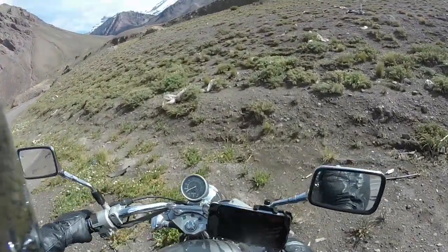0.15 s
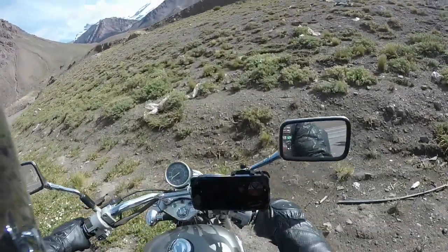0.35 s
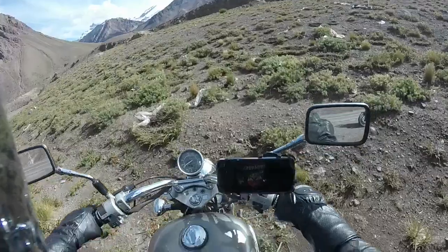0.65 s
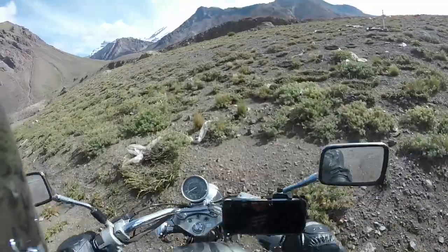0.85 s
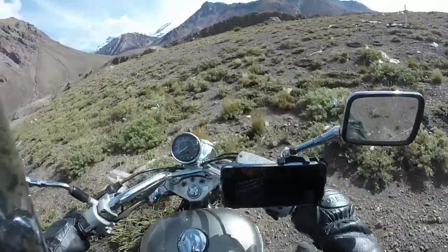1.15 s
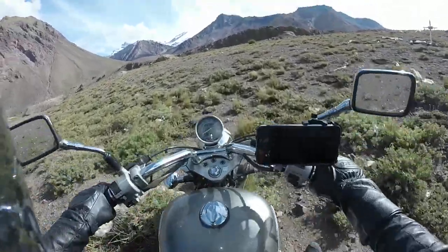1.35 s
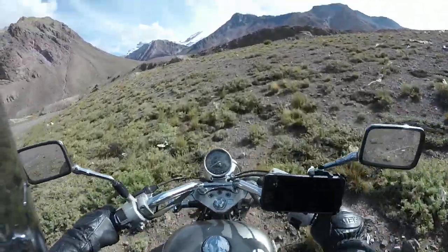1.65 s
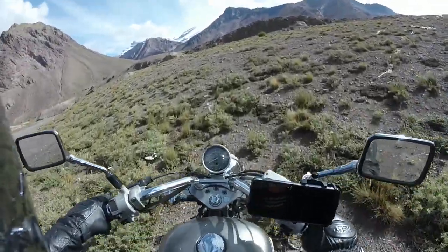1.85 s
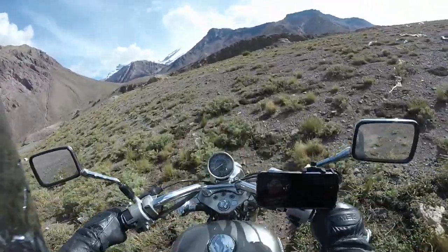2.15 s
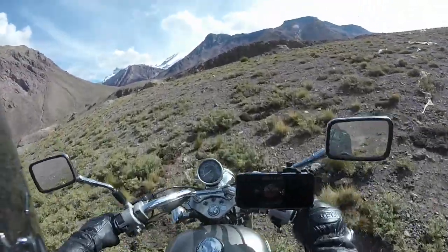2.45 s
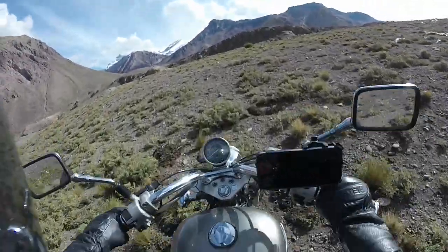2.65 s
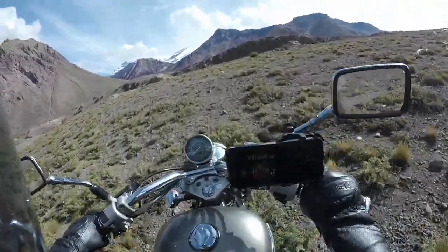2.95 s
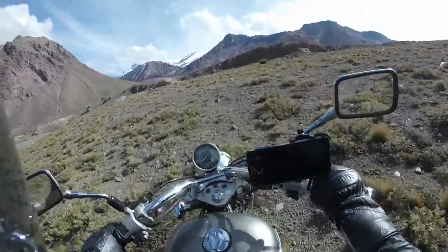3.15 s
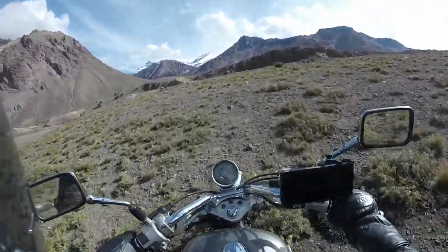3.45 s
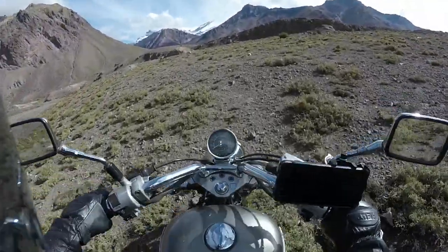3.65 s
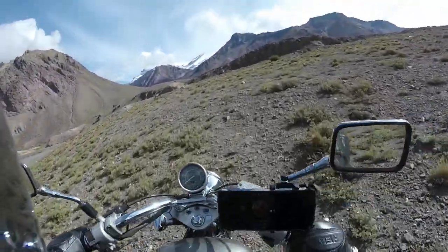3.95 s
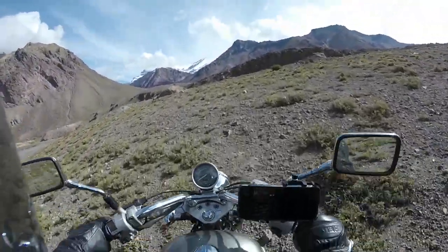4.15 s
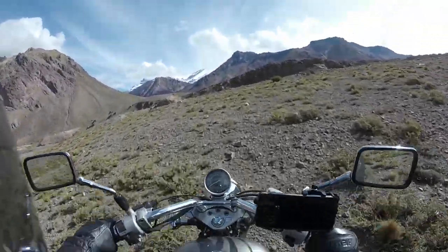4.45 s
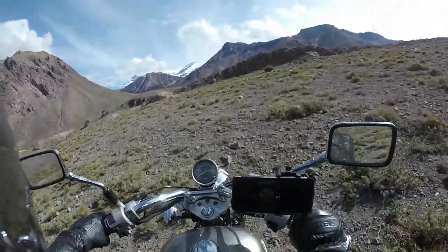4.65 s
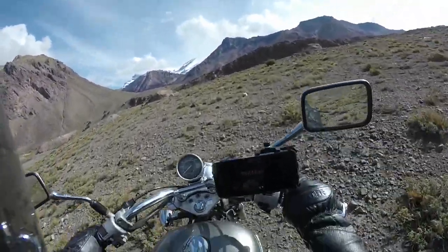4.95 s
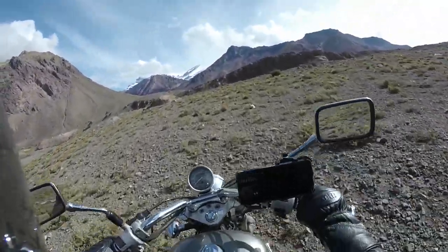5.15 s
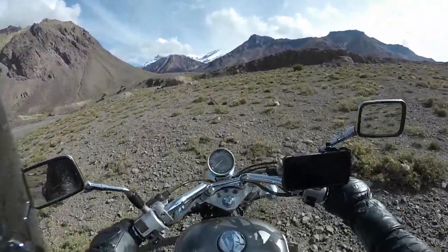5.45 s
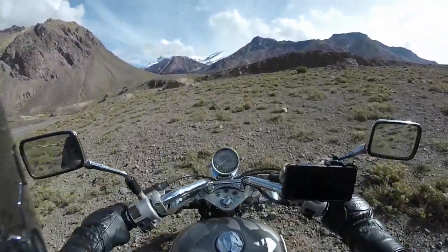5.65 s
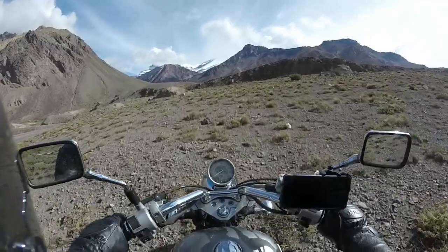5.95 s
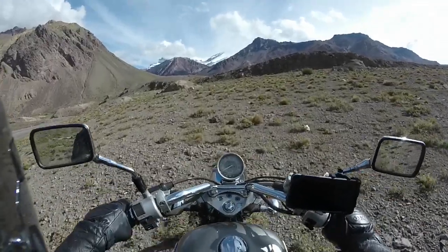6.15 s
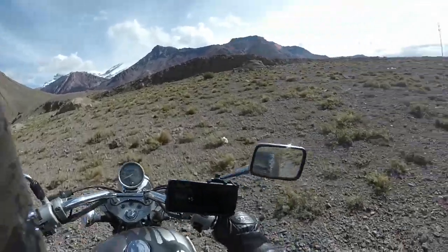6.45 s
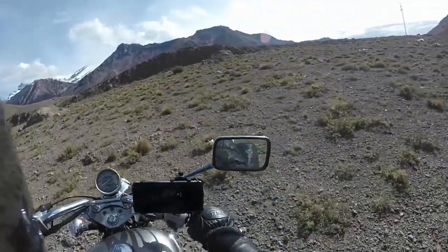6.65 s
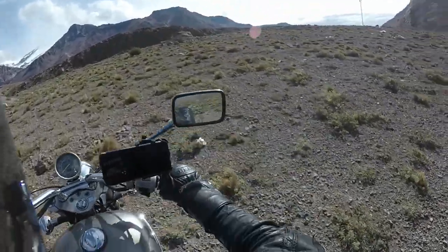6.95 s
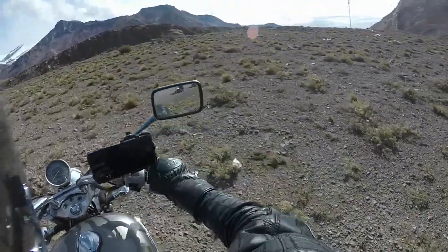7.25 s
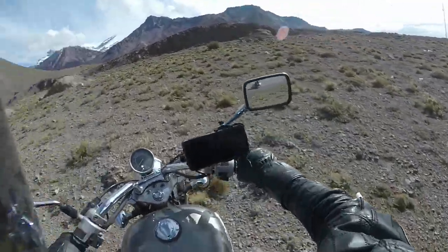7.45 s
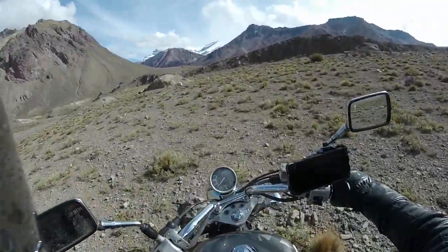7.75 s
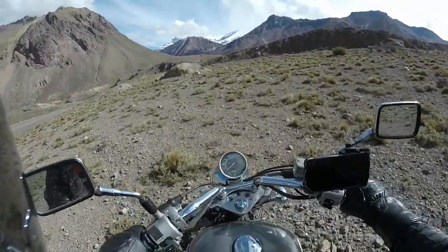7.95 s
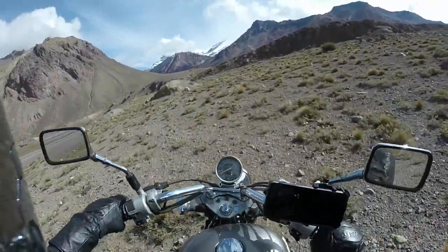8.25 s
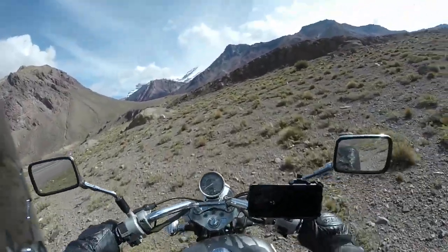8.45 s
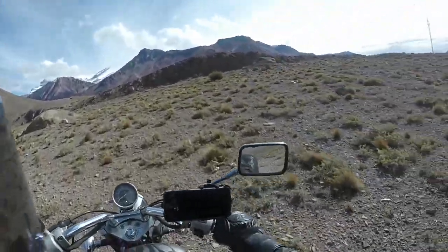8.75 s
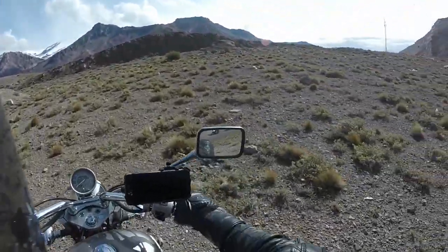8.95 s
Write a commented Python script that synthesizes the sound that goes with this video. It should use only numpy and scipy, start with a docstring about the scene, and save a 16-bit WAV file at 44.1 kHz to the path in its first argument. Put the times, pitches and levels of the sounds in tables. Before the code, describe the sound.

Slow, lumpy twin-cylinder exhaust at first, with a faint hiss that soon stops and a cluster of frame thuds and hard rattling knocks. The motor then pulls harder, its bark thickening into a drone with small metallic pings. Afterwards the revs sag, dip briefly and recover unevenly, with brief helmet-on-jacket strokes. Stones rumble softly underneath; outdoors, no echo, microphone on the rider.

```python
"""A V-twin cruiser crawls up a gravel track in open hills, heard from a camera on the rider's helmet.
At first the engine turns slowly, its two cylinders firing unevenly into resonant pipes over ringing fins and
ticking valves; a faint hiss stops at 1.6 s. Bumps ring the frame and the camera mount, mostly in the first 4 s,
with bursts of deep noise near 33 Hz as the mount bounces. The engine climbs to its fastest near 5.5 s; then its
speed wavers, and stick-slip noise of helmet on jacket comes in strokes. Stones rumble softly throughout."""
import sys
import numpy as np
from scipy import signal
from scipy.fft import rfft, irfft, next_fast_len
from scipy.io import wavfile
from scipy.ndimage import uniform_filter1d

SR = 44100
rng = np.random.default_rng(int(sys.argv[2]) if len(sys.argv) > 2 else 0)


def to_wav(s):
    """Save 16-bit WAV."""
    ch = np.atleast_2d(s).T  # columns
    pcm = np.round(np.clip(ch, -1, 1) * 32767)  # PCM
    wavfile.write(sys.argv[1], SR, pcm.astype(np.int16))


N = 400869


def from_db(db):
    """Level law: decibels to amplitude gain."""
    return 10 ** (np.asarray(db) / 20)


def in_time(rows):
    """Linear interpolation: the columns of a curve at every sample."""
    s, *columns = np.transpose(rows)
    return [np.interp(np.arange(N) / SR, s, c) for c in columns]


def even(x, size=11000):
    """Level normalisation: hold the running rms at 1."""
    power = uniform_filter1d(uniform_filter1d(x * x, size), size)
    return x / np.sqrt(np.maximum(power, 1e-20))


def cut(x, hz, kind, order=2):
    """Butterworth filtering: low- or high-pass with a flat passband."""
    return signal.sosfilt(signal.butter(order, hz, kind, fs=SR, output="sos"), x)


def colour(x, spectrum):
    """Spectral shaping by (f/Hz, level/dB) points, falling away beyond both ends."""
    hz, db = np.transpose(spectrum)
    size = next_fast_len(N + SR // 4)
    bins = np.maximum(np.arange(size // 2 + 1) * SR / size, 1)
    low_end = np.minimum(bins / hz[0], 1) ** 2
    high_end = np.minimum(hz[-1] / bins, 1) ** 6
    gain = from_db(np.interp(np.log(bins), np.log(hz), db)) * low_end * high_end
    return irfft(rfft(x, size) * gain, size)[:N]


def resonate(x, hz, width_hz, db):
    """Damped resonance: one mode with the given gain at its top."""
    r = np.exp(-np.pi * width_hz / SR)
    poles = [1, -2 * r * np.cos(2 * np.pi * hz / SR), r * r]
    return from_db(db) * (1 - r * r) / 2 * signal.lfilter([1, 0, -1], poles, x + 1e-18)


def glide(x, hz, width_hz):
    """Heterodyne resonance: a mode whose pitch may move, with gain 1 at its top."""
    turn = np.exp(2j * np.pi * np.cumsum(hz * np.ones(N)) / SR)
    r = np.exp(-np.pi * width_hz / SR)
    return 2 * np.real(turn * signal.lfilter([1 - r], [1, -r], x / turn + 1e-18))


def body(x, modes):
    """Modal superposition: resonances side by side."""
    return sum(resonate(x, *mode) for mode in modes)


def clicks(at, sizes):
    """Impulse excitation: single clicks at the given samples."""
    return np.bincount(np.clip(at, 0, N - 1).astype(int), sizes, N)


def fade(x, seconds):
    """Exponential decay: each click leaves a tail of its own height."""
    return signal.lfilter([1], [1, -np.exp(-1 / (seconds * SR))], x + 1e-18)


def swell(start, length, db, attack_s, release_s, sag_db_per_s):
    """Exponential envelope: the gain rises, sags while it lasts and dies away."""
    t = np.arange(N) / SR - start
    edges = np.minimum(t, 0) / attack_s - np.maximum(t - length, 0) / release_s
    return from_db(db - sag_db_per_s * np.clip(t, 0, length)) * np.exp(np.maximum(edges, -20))


# crankshaft speed: t/s, speed/(turns per minute)
CRANK_SPEED = [(0.0, 1843), (0.3, 1852), (0.9, 1842), (1.25, 2047), (1.5, 2222), (1.7, 2134), (2.0, 2007),
               (2.25, 2087), (2.55, 2095), (2.75, 2497), (3.0, 2372), (3.25, 2399), (3.45, 2219),
               (3.75, 2145), (4.1, 2158), (4.35, 2333), (4.55, 2499), (4.85, 2842), (5.25, 3029),
               (5.55, 3194), (5.85, 3060), (6.1, 3129), (6.35, 3091), (6.65, 2795), (6.95, 2626),
               (7.2, 2491), (7.35, 1976), (7.55, 2488), (7.75, 2385), (8.05, 2514), (8.25, 2131),
               (8.45, 2480), (8.7, 2688), (8.9, 2292), (9.09, 2410)]
# load on the engine: t/s, level/dB
ENGINE_LOAD = [(0.0, -8), (0.35, -4.5), (0.9, -8), (1.2, -5.5), (1.5, 0.5), (2.1, 1), (2.8, 2.5),
               (3.15, 2.5), (3.6, 0.5), (4.35, 1), (4.95, 3.5), (5.5, 1.5), (7.1, 0.5), (7.3, -1),
               (7.55, 1), (7.8, -5.5), (8.2, -0.5), (8.35, 1), (9.09, -4)]
# level of the exhaust's bark beyond what the speed gives: t/s, level/dB
BARK_LEVEL = [(0.0, 3), (0.4, 2), (1.15, -1), (1.65, -4.5), (2.3, 7), (3.5, 5), (3.9, 4.5), (5.0, 7.5),
              (5.35, 7.5), (6.0, 3), (6.7, 4), (7.4, 2), (7.85, -5.5), (8.2, -2), (8.35, 2.5), (8.7, 3.5),
              (9.09, -4)]
# growth of each voice: level/dB at cruising speed, level/dB per doubling of speed, share of the swing
# (the swing is the bark's own level curve for the bark, the load for the rest)
BOOM_GROWTH = (-37.5, 10.8, 0.27)
BARK_GROWTH = (-54.5, 10, 0.88)
CLATTER_GROWTH = (-58, 4.1, 1)
TICK_GROWTH = (-78, 0.68, 2.97)
FRONT_PHASE, REAR_PHASE = -0.135, 0.275   # firing moments (share of a cycle of two turns)
CRUISE_RPM = 2400


def engine():
    """Periodic excitation: exhaust, fins and valve gear are all locked to the crankshaft."""
    rpm, = in_time(CRANK_SPEED)
    load_db, = in_time(ENGINE_LOAD)
    bark_db, = in_time(BARK_LEVEL)
    front = firings(rpm, FRONT_PHASE, jitter_s=.00003)
    rear = firings(rpm, REAR_PHASE, jitter_s=.00003)
    both = np.r_[front, rear] + 0.0008 * SR   # the metal parts answer just after the puff
    boom = even(booming(rpm, both, rough_db=3.0, rear_share=0.83))
    bark = exhaust_bark(front, rear, rpm)
    hum = drones(front, rpm, rough_db=3.0, build_up_hz=71.5)
    clatter = fins(front, rear, rpm, load_db)
    ticks = valve_ticks(both)
    return (boom * loudness(BOOM_GROWTH, rpm, load_db)
            + bark * loudness(BARK_GROWTH, rpm, bark_db)
            + hum + pings()
            + clatter * loudness(CLATTER_GROWTH, rpm, load_db)
            + ticks * loudness(TICK_GROWTH, rpm, load_db))


def loudness(law, rpm, swing_db):
    """Power law: the gain of one engine voice grows with speed and with a share of its swing."""
    cruise_db, db_per_doubling, swing_share = law
    return from_db(cruise_db + db_per_doubling * np.log2(rpm / CRUISE_RPM) + swing_share * swing_db)


def firings(rpm, phase, jitter_s):
    """Four-stroke cycle: the samples at which a cylinder fires, once in two turns."""
    cycles = np.cumsum(rpm) / (2 * 60 * SR) - phase
    at = np.flatnonzero(np.diff(np.floor(cycles)))
    return at + jitter_s * SR * rng.standard_normal(len(at))


# exhaust boom before the mufflers: order (multiple of the cycle rate), relative level/dB
BOOM_ORDERS = [(2, -6), (3, -0.5), (4, -5.5), (5, 8), (6, -15), (7, 7), (8, 4), (9, -5), (10, 0), (11, -2),
               (12, -9.5), (13, -1), (14, -9), (15, -1.5), (16, -9), (17, -4), (18, -15.5), (19, -11),
               (20, -18.5), (21, -21), (22, -13.5), (23, -18.5), (24, -13), (25, -17), (26, -7)]
# transmission of the mufflers: f/Hz, level/dB
MUFFLER_RESPONSE = [(45, -7.5), (100, -7.5), (135, -0.5), (190, 2), (240, -3.5), (295, 5), (350, 0.5),
                    (450, -16.5), (580, -4), (700, -16.5)]
PUSH_LAG, PUSH_SHARE = 0.132, 0.55   # piston's push after the valve's puff: share of a cycle, relative strength


def booming(rpm, at, rough_db, rear_share):
    """Harmonic synthesis: unevenly spaced puffs set the order phases; slow strokes burn less evenly."""
    crest = 0.0694   # each puff peaks this share of a cycle after its valve opens
    cycles = np.cumsum(rpm) / (2 * 60 * SR) - crest
    orders = 0
    for order, db in BOOM_ORDERS:
        front_puff = np.exp(-2j * np.pi * order * FRONT_PHASE)
        rear_puff = rear_share * np.exp(-2j * np.pi * order * REAR_PHASE)
        push = 1 + PUSH_SHARE * np.exp(-2j * np.pi * order * PUSH_LAG)
        phase = np.angle((front_puff + rear_puff) * push)
        orders = orders + from_db(db) * np.cos(2 * np.pi * order * cycles + phase)
    burn = np.interp(np.arange(N), np.sort(at), rng.standard_normal(len(at)))
    strokes = orders * from_db(rough_db * (2000 / rpm) ** 3 * burn)
    ring = resonate(strokes, 210.3, 58, -0.21)   # the pipes' lowest resonance rings on between puffs
    return colour(strokes + ring, MUFFLER_RESPONSE)


# upper resonances of the exhaust pipes: f/Hz, width/Hz, relative level/dB, rear pipe against front level/dB
PIPE_MODES = [(439, 350, -2.5, -3.5), (585, 180, -2.5, -5), (696.5, 710, -6, -0.5), (873, 550, -10, 4)]
PIPE_LAG_S = .0003   # the upper modes sound once the valve is open


def exhaust_bark(front, rear, rpm):
    """Superposition of two sources: each cylinder's puffs ring a pipe of its own."""
    front_modes = [(hz, width_hz, db) for hz, width_hz, db, _ in PIPE_MODES]
    rear_modes = [(hz, width_hz, db + rear_db) for hz, width_hz, db, rear_db in PIPE_MODES]
    exhaust = sum(pipe(at + PIPE_LAG_S * SR, rpm, modes, rough_db=1.3, gas=.009)
                  for at, modes in ((front, front_modes), (rear, rear_modes)))
    return even(colour(exhaust, [(290, -20.0), (400, 2.0), (880, -8), (1000, -4.5)]))


def pipe(at, rpm, modes, rough_db, gas, build_up_hz=70):
    """Pipe resonance: puffs, less even at low speed, and turbulent gas excite standing waves."""
    unevenness_db = rough_db * (2000 / rpm[np.clip(at, 0, N - 1).astype(int)]) ** 2
    burn_db = unevenness_db * rng.standard_normal(len(at))
    flow = fade(fade(clicks(at, from_db(burn_db)), 0.0034), 0.0027) / (0.00013 * SR)
    turbulence = gas * flow * rng.standard_normal(N) * (2300 / rpm) ** 3
    out = 0
    for k, (hz, width_hz, db) in enumerate(modes):
        puffs = clicks(at, from_db(burn_db + unevenness_db * rng.standard_normal(len(at))))
        # turbulence feeds the upper modes most
        drive = puffs + turbulence * np.sqrt(hz / 500)
        swelling = resonate(drive, hz, build_up_hz, 0)   # a standing wave needs a few round trips
        # at the open end successive modes swing in opposite senses
        out = out + (-1) ** (k + 1) * resonate(swelling, hz, width_hz, db)
    return out


# the front pipe's two strongest standing waves; the lower one's pitch shifts as different engine orders
# come to the fore: t/s, lower level/dB, upper level/dB, lower f/Hz
STANDING_WAVES = [(0, -67.5, -70.5, 377), (3.098, -50, -56.5, 395), (3.599, -49, -61.5, 398.3),
                  (4.651, -54, -63, 366), (4.97, -38.5, -46, 365), (5.2, -50, -51, 374),
                  (5.55, -42, -55, 397), (5.85, -39, -47, 387), (6.099, -37.5, -47.5, 391.4),
                  (6.501, -43.5, -44, 387.5), (7.35, -58, -54.5, 379), (8.08, -45.5, -62.5, 365),
                  (8.27, -61, -65, 362), (8.5, -52, -48, 393), (9.09, -57.5, -60, 374)]
DRONE_LAG_S = 0.0021   # the waves sound once the valve is open
UPPER_DRONE_HZ, DRONE_WIDTHS_HZ = 577.8, (19, 41)   # widths of the lower and the upper wave


def drones(front, rpm, rough_db, build_up_hz):
    """Standing waves: they build up after each puff and hum on the nearest orders, more evenly at speed."""
    lower_db, upper_db, lower_hz = in_time(STANDING_WAVES)
    at = front + DRONE_LAG_S * SR
    unevenness_db = rough_db * (2000 / rpm[np.clip(at, 0, N - 1).astype(int)]) ** 3
    puffs = clicks(at, from_db(unevenness_db * rng.standard_normal(len(at))))
    out = 0
    for hz, width_hz, db in zip((lower_hz, UPPER_DRONE_HZ), DRONE_WIDTHS_HZ, (lower_db, upper_db)):
        swelling = glide(puffs, hz, build_up_hz)
        out = out + from_db(db) * even(glide(swelling, hz, width_hz), size=6000)
    return out


# resonances of the cooling fins and covers: f/Hz, width/Hz, relative level/dB,
# rear cylinder against front level/dB, delay after the firing t/s, share of gear whirr
FIN_MODES = [(1122, 55, 3, -0.5, -.002, 0.1), (1234, 80, 5, -4, -.002, 0.084),
             (1620, 140, -2.5, 1, 0, 0.34), (1872, 21, -2, 1, 0.0038, 0.21),
             (2375, 100, -2, -2, .0004, 0.25), (2650, 440, -14.5, 2.5, .0004, .1),
             (3017, 53, -11.5, 3.5, 0.0043, .08)]
FIN_TILT_DB = -0.5   # speed favours the high fins: per doubling of speed and per octave below


def fins(front, rear, rpm, load_db):
    """Forced modal vibration: strokes knock each fin; gear whirr stands out at light load."""
    whirr = from_db(-0.9 * load_db)
    tilt_db = FIN_TILT_DB * np.log2(rpm / CRUISE_RPM)
    out = 0
    for hz, width_hz, db, rear_db, delay_s, whirr_share in FIN_MODES:
        force_db = np.r_[np.zeros(len(front)), np.full(len(rear), rear_db)]
        at = np.r_[front, rear] + delay_s * SR
        burst = rattle(at, force_db, decay_s=.006, rise_s=.002, steady=whirr_share * whirr,
                       spread_db=3.5, slap=.25, tap=.5)
        tilt = from_db(tilt_db * np.log2(FIN_MODES[0][0] / hz))
        out = out + tilt * resonate(burst, hz, width_hz, db)
    return even(colour(out, [(700, -18.5), (1050, 3.5), (2900, 3.0), (3150, -1)]))


def rattle(at, force_db, decay_s, rise_s, steady, spread_db, slap, tap):
    """Contact noise: a tap, a later slap and a noise burst at each firing, over a steady share of noise."""
    # the play of the parts limits each contact
    sizes = from_db(force_db + spread_db * np.clip(rng.standard_normal(len(at)), -2, 2))
    bursts = fade(fade(clicks(at, sizes), decay_s), rise_s) / (rise_s * SR)
    taps = clicks(at + SR * rise_s, sizes)
    slap_delay_s = rise_s + 2 * decay_s * rng.random(len(at))   # a loose part strikes a moment later
    slaps = clicks(at + SR * slap_delay_s, sizes)
    noise = (bursts + steady) * rng.standard_normal(N)   # the steady share is gears and chain
    return noise + np.sqrt(decay_s * SR) * (tap * taps + slap * slaps)


# resonances of the valve gear: f/Hz, width/Hz, relative level/dB
VALVE_MODES = [(3250, 810, -8.5), (4080, 510, -12), (4780, 310, -8.5), (5740, 440, -6.5), (7000, 500, -15)]


def valve_ticks(at):
    """Impact excitation: each valve closes with a force of its own and rings the valve gear."""
    seating_db = 3.5 * np.clip(rng.standard_normal(len(at)), -2, 2)
    valves = 0
    for mode in VALVE_MODES:
        contacts = rattle(at, seating_db, decay_s=0.003, rise_s=0.0011, steady=0.14,
                          spread_db=2.5, slap=0.25, tap=0)
        valves = valves + resonate(contacts, *mode)
    return even(colour(valves, [(2500, -4.0), (3400, 11.5), (6200, -2.5), (7600, -7.5)]))


# hard strokes under load that make one fin ping: t/s, peak level/dB
FIN_PINGS = [(3.036, -52), (3.088, -46), (3.609, -47.5), (4.054, -50), (4.326, -51), (4.424, -59),
             (4.841, -45), (4.883, -40.5), (4.926, -39.5), (5.328, -53), (5.944, -46), (5.982, -41.5),
             (6.138, -50), (6.177, -50)]
PING_HZ, PING_WIDTH_HZ, PING_BUILD_UP_HZ = 1220, 82, 110


def pings():
    """Cascaded resonance: the fin's ring swells for a few milliseconds, then decays."""
    s, db = np.transpose(FIN_PINGS)
    swelling = resonate(signal.unit_impulse(SR // 8), PING_HZ, PING_BUILD_UP_HZ, 0)
    ring = resonate(swelling, PING_HZ, PING_WIDTH_HZ, 0)
    return signal.oaconvolve(clicks(s * SR, from_db(db)), ring / np.abs(ring).max())[:N]


# moments when the throttle snaps shut: start t/s, length t/s, dip level/dB
THROTTLE_CUTS = [(1.17, 0.087, -3), (7.296, 0.016, -12), (8.185, 0.05, -8)]
SHUT_S, REOPEN_S = 0.016, 0.0061   # time constants of the dip


def shut_offs():
    """Amplitude modulation: the whole engine dips while the throttle is shut."""
    dips = [dip_db * swell(start, length, 0, SHUT_S, REOPEN_S, 0) for start, length, dip_db in THROTTLE_CUTS]
    return from_db(sum(dips))


# dull thuds of the frame over bumps: t/s, peak level/dB, favoured f/Hz
FRAME_THUDS = [(0.583, -26, 90), (0.643, -24, 250), (0.808, -31, 120), (1.275, -32, 198), (1.31, -30, 189),
               (1.366, -19.5, 220), (1.37, -30, 754), (1.523, -15.5, 180), (1.531, -19.5, 320),
               (1.55, -19.5, 75), (1.586, -27.5, 129), (1.612, -24.5, 200), (1.723, -30, 240),
               (1.759, -21.5, 390), (1.81, -33, 150), (2.245, -26.5, 170), (2.478, -27, 200),
               (2.655, -23, 150), (3.89, -23, 200), (7.392, -23, 90), (8.621, -29, 129)]
# resonances of the frame: f/Hz, width/Hz, relative level/dB
FRAME_MODES = [(89, 5.8, 12), (166, 67, 22), (305, 57, 16.5), (416, 32, -21.5), (570, 90, -10.5),
               (760, 110, -10)]


def frame_thuds():
    """Soft impact: a low contact cutoff leaves only the frame's lower modes strong."""
    return sum(blow(*thud, soft_hz=780, chatter_s=0.011, modes=FRAME_MODES, chatter=0.065)
               for thud in FRAME_THUDS)


# sharp knocks of the camera mount: t/s, peak level/dB, favoured f/Hz, hardness of the contact as cutoff f/Hz,
# chatter decay t/s
MOUNT_KNOCKS = [(0.154, -26.5, 1430, 2700, .003), (0.3501, -34, 770, 2600, 0.0061),
                (0.642, -25, 1450, 3000, 0.0066), (0.837, -33, 400, 2400, 0.0042),
                (1.44, -42, 603, 2700, 0.0065), (1.499, -32.5, 400, 2000, .003),
                (1.52, -23.5, 1550, 2800, 0.009), (1.563, -22.5, 1100, 2500, 0.0025),
                (2.303, -35, 694, 2300, .005), (2.478, -31.5, 695, 2500, 0.0077),
                (2.587, -32, 1180, 2500, 0.0059), (2.687, -21, 1330, 2900, 0.0043),
                (2.886, -35.5, 890, 2400, 0.0023), (2.968, -35, 1400, 2490, 0.0046),
                (3.882, -23.5, 1210, 2400, 0.0027), (3.966, -24.5, 400, 2000, 0.0025),
                (7.258, -34, 910, 2000, .012), (8.607, -22.5, 1500, 1800, 0.0044)]
# resonances of the mount: f/Hz, width/Hz, relative level/dB
MOUNT_MODES = [(209, 48, 16), (290, 44, 30.5), (397, 240, 26.5), (730, 67, 23.5), (1180, 150, 15),
               (1430, 67, 14.5), (1534, 71, 11), (2400, 1500, 9.5)]


def mount_knocks():
    """Hard impact: a high contact cutoff lets the mount's upper modes ring."""
    return sum(blow(*knock, MOUNT_MODES, chatter=0.093) for knock in MOUNT_KNOCKS)


STRUCK_WIDTH, STRUCK_DB = 0.49, 11.5   # emphasis of the favoured pitch: width as a share of it, gain (dB)


def blow(s, peak_db, hz, soft_hz, chatter_s, modes, chatter):
    """Modal impact: a blow rings the modes, most of all near its own pitch; loose parts chatter after it."""
    out, hit = np.zeros(N + SR), signal.unit_impulse(SR // 4)
    contact = hit + chatter * fade(hit, chatter_s) * rng.standard_normal(len(hit))
    ring = cut(body(contact, modes), soft_hz, "low", order=5)
    ring = ring + resonate(ring, hz, STRUCK_WIDTH * hz, STRUCK_DB)
    start = int(s * SR)
    out[start:start + len(ring)] = from_db(peak_db) * ring / np.abs(ring).max()
    return out[:N]


# strokes of the helmet on the jacket as the head turns: start t/s, length t/s, level/dB,
# shell's ring at the start f/Hz, at the end f/Hz, ring against grains level/dB
RUB_STROKES = [(1.296, 0.066, -53.5, 700, 775, 1), (6.476, 0.09, -41.5, 1880, 1790, 1),
               (6.976, 0.023, -49, 925, 900, 10), (7.131, 0.031, -47.5, 1740, 1620, 1),
               (7.421, 0.042, -45.5, 1850, 1700, 9), (7.465, .07, -50, 670, 945, 11),
               (7.574, 0.093, -42, 1720, 1450, 14.5), (7.698, 0.034, -53.5, 1300, 1160, 10.5),
               (7.8, 0.18, -53, 1660, 1490, 8.5), (8.587, 0.11, -42, 1750, 1400, 3.5),
               (8.734, 0.25, -45, 1850, 1700, 0)]
# colour of the cloth grains: f/Hz, relative level/dB
CLOTH_SPECTRUM = [(50, -0.5), (75, -3.5), (110, 1), (400, 10), (650, -1), (900, 3.5), (1150, -1),
                  (1600, -3.5), (1950, -5), (2300, -10.5), (3050, -26.5), (3700, -22), (4250, -29.5),
                  (4700, -24.5), (5250, -33.5), (5900, -28), (6900, -49)]
RUB_ATTACK_S, RUB_RELEASE_S, RUB_SAG_DB_PER_S = 0.028, 0.028, 14
SHELL_WIDTH_HZ = 97


def rubbing(slips_per_s, spread_db):
    """Stick-slip friction: cloth slips in dense grains; the shell's ring glides as the contact slides."""
    slipping = rng.random(N) < slips_per_s / SR
    slips = slipping * rng.standard_normal(N) * from_db(spread_db * rng.standard_normal(N))
    grains = even(colour(slips, CLOTH_SPECTRUM))
    out = 0
    for start, length, db, from_hz, to_hz, ring_db in RUB_STROKES:
        stroke = swell(start, length, db, RUB_ATTACK_S, RUB_RELEASE_S, RUB_SAG_DB_PER_S)
        ring_hz, = in_time([(start, from_hz), (start + length, to_hz)])
        ring = from_db(ring_db) * glide(grains, ring_hz, SHELL_WIDTH_HZ)
        out = out + stroke * (grains + ring)
    return out


# bursts of deep noise near 33 Hz as the camera mount bounces: start t/s, length t/s, level at the start/dB
MOUNT_BOUNCES = [(0.579, 0.059, -21.5), (0.827, 0.0097, -28), (1.019, 0.092, -33), (1.318, 0.08, -23.5),
                 (1.54, 0.02, -18.5), (1.771, 0.027, -18.5), (1.886, 0.011, -20), (2.236, 0.26, -29),
                 (2.482, 0.011, -24), (2.593, 0.11, -26.5), (2.792, 0.23, -30.5), (3.944, 0.056, -30.5),
                 (4.126, 0.17, -31.5), (5.263, 0.032, -36), (5.642, 0.021, -39), (7.113, .3, -39),
                 (7.597, 0.16, -28.5), (8.601, 0.079, -24.5)]
# deep noise between the bounces: t/s, level/dB
DEEP_FLOOR = [(0.0, -32.5), (3.0, -38), (4.6, -37.5), (7.8, -38.5), (8.1, -41), (9.09, -41.5)]
BOUNCE_ATTACK_S, BOUNCE_RELEASE_S, BOUNCE_SAG_DB_PER_S = 0.0019, 0.051, 5.5


def bounce_strength():
    """Power addition: the bounces and the floor between them sum in power to one gain."""
    floor_db, = in_time(DEEP_FLOOR)
    bounces = sum(swell(*bounce, BOUNCE_ATTACK_S, BOUNCE_RELEASE_S, BOUNCE_SAG_DB_PER_S) ** 2
                  for bounce in MOUNT_BOUNCES)
    return np.sqrt(from_db(floor_db) ** 2 + bounces)


# colour of the deep noise: f/Hz, relative level/dB
BOUNCE_COLOUR = [(14, -6), (24, -5.5), (33, 3.5), (48, -5.5), (62, -9.5), (76, -13), (100, -26),
                 (200, -22.5)]


def mount_bouncing(strength):
    """Narrow-band noise: a spectrum peaking at 33 Hz approximates the bounce of the mount."""
    return strength * even(colour(rng.standard_normal(N), BOUNCE_COLOUR), size=3500)


# tyres and frame rumbling over the stony track: f/Hz, relative level/dB
RUMBLE_COLOUR = [(90, -2), (115, -7.5), (220, -1), (350, -3), (500, -15.5), (800, -23.5), (1000, -43)]
# stoniness of the track, as the rumble's level before the jolts: t/s, level/dB
STONINESS = [(0, -48), (1.3, -52.5), (2.0, -46), (3.0, -45.5), (4.3, -46), (5.1, -51), (5.45, -47),
             (5.65, -60), (6.22, -48), (6.33, -39), (6.6, -48), (7.1, -45.5), (7.6, -48.5), (8.1, -45),
             (9.09, -43)]
TRACK_FOLLOWS = 0.31   # the rumble's share of the bounces' swing in dB


def track(strength):
    """Rolling noise: the rumble follows the stones and swells with the jolts that bounce the mount."""
    stones_db, = in_time(STONINESS)
    bounce_db = 20 * np.log10(strength)
    jolts_db = TRACK_FOLLOWS * (bounce_db - bounce_db.mean())
    return from_db(stones_db + jolts_db) * even(colour(rng.standard_normal(N), RUMBLE_COLOUR))


# faint hiss that stops early on: t/s, level/dB
HISS_LEVEL = [(0, -70), (1.58, -72), (1.63, -100), (9.09, -100.5)]
# colour of the hiss: f/Hz, relative level/dB
HISS_COLOUR = [(2000, -8), (7400, -8.5), (8200, -4.5), (9200, -8.5), (10200, -9.5), (11000, -6),
               (15500, -5.5)]


def faint_hiss():
    """Broadband noise: coloured random noise follows a level curve."""
    hiss_db, = in_time(HISS_LEVEL)
    return from_db(hiss_db) * even(colour(rng.standard_normal(N), HISS_COLOUR))


def scene():
    """Free field: all sources add close and dry, as the hills return no echo."""
    strength = bounce_strength()
    bike = engine() * shut_offs()
    blows = frame_thuds() + mount_knocks()
    cloth = rubbing(slips_per_s=3000, spread_db=3.0)
    return (bike + blows + cloth + mount_bouncing(strength) + track(strength) + faint_hiss())[None]


CUTOFF_HZ = 15700


def record(dry):
    """Band limitation: the camera cuts the top with a steep elliptic low-pass."""
    return signal.sosfilt(signal.ellip(10, .1, 80, CUTOFF_HZ, fs=SR, output="sos"), dry)


dry = scene()
out = record(dry)
to_wav(out)
```